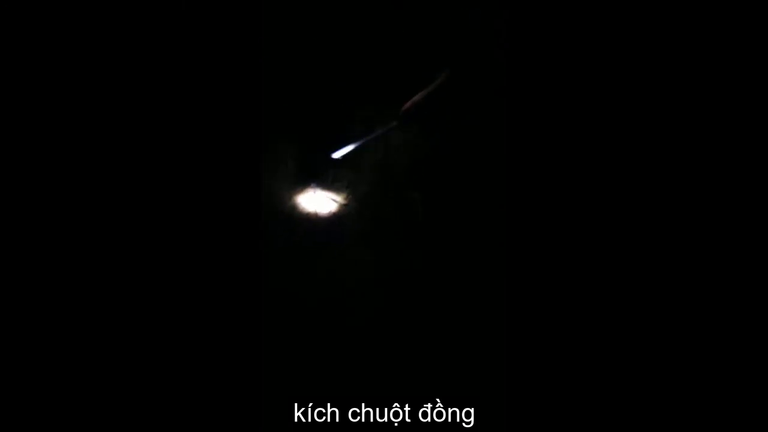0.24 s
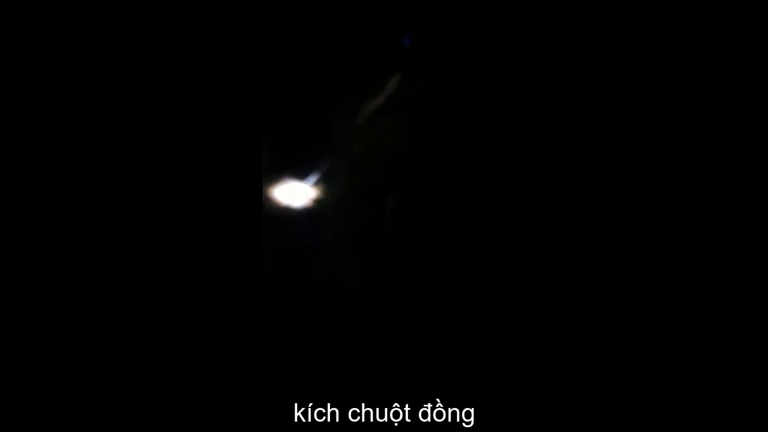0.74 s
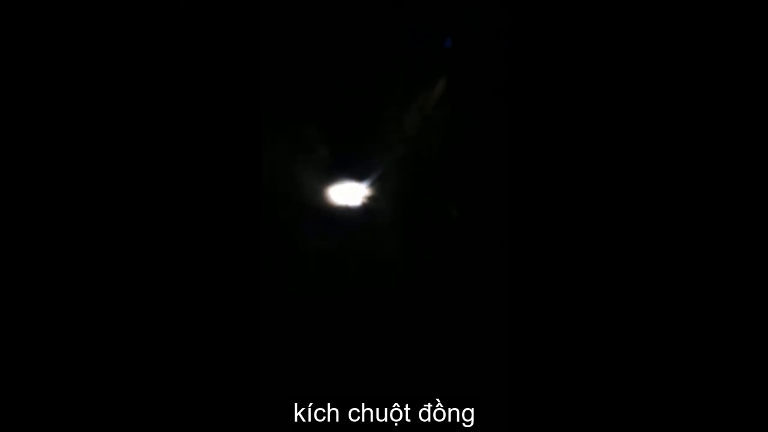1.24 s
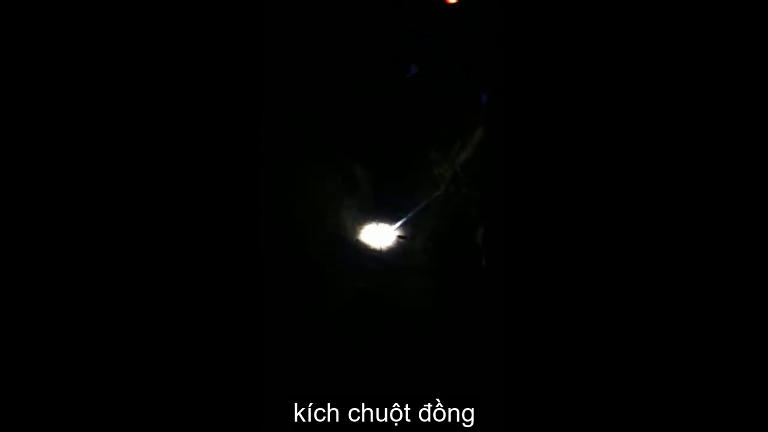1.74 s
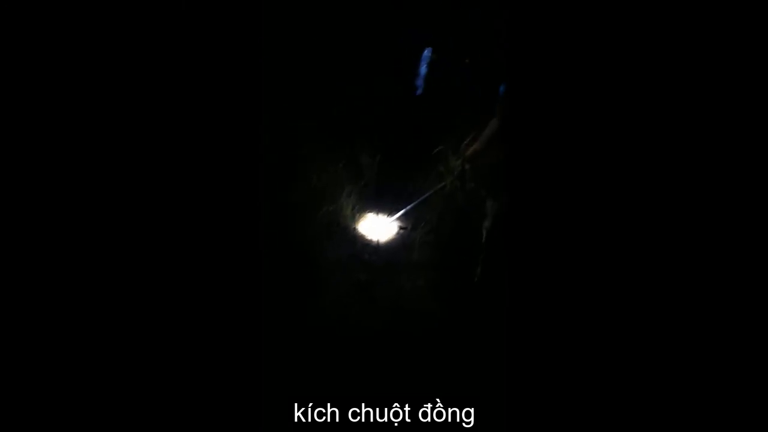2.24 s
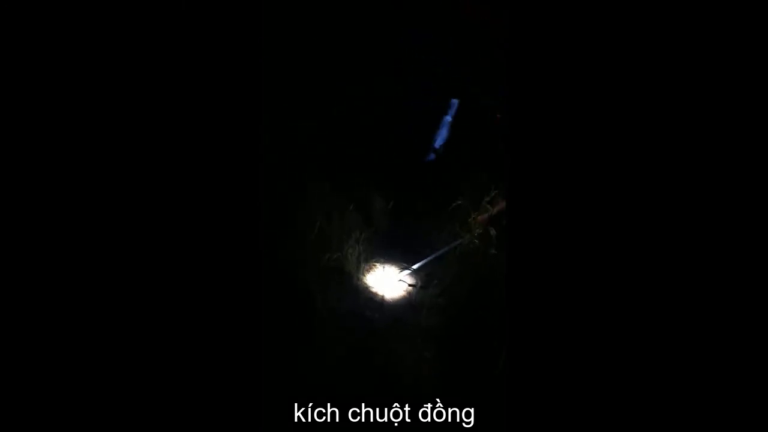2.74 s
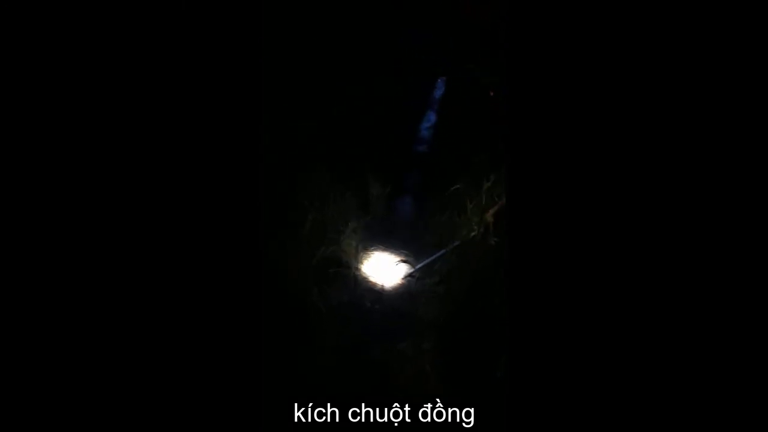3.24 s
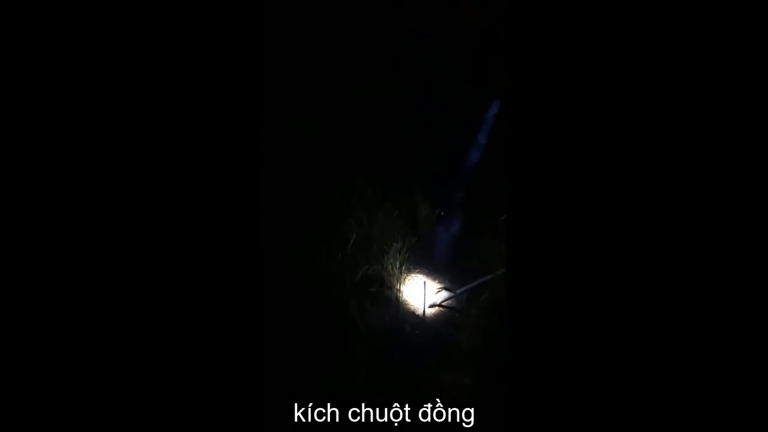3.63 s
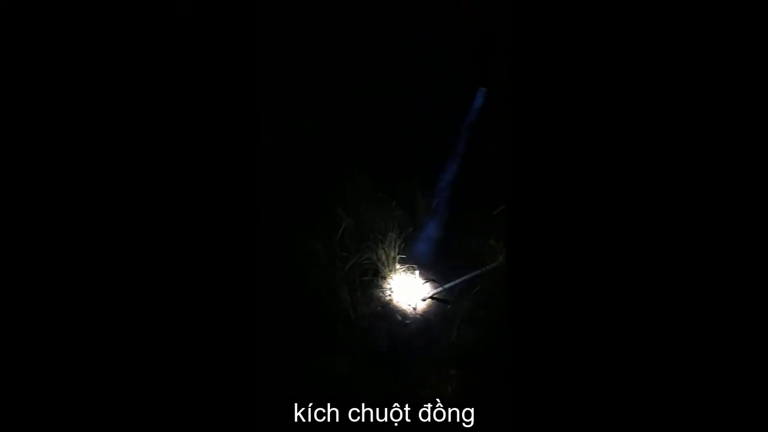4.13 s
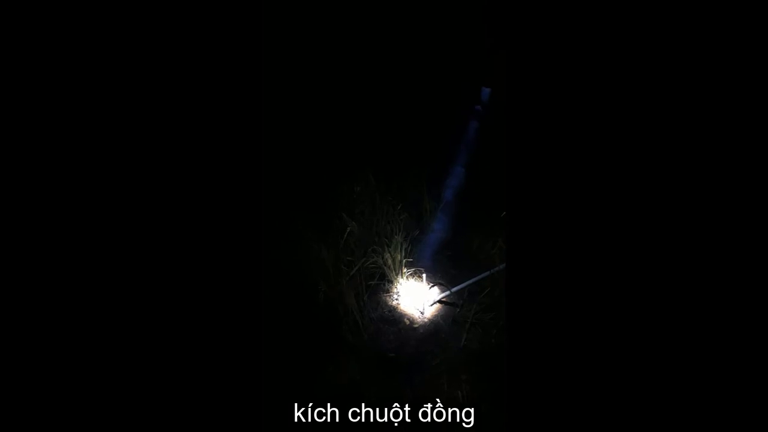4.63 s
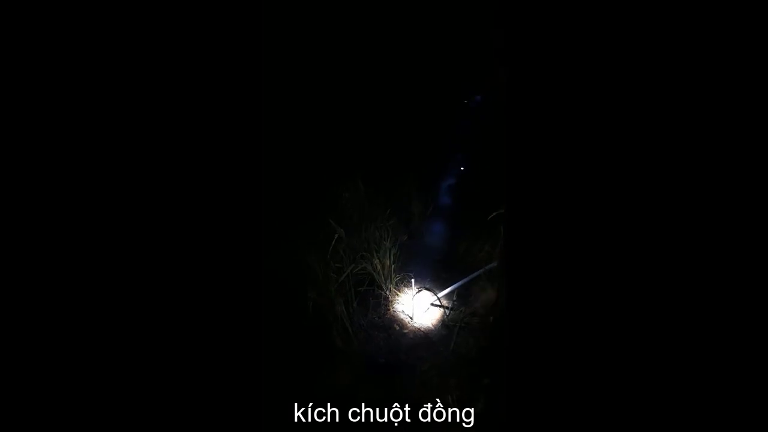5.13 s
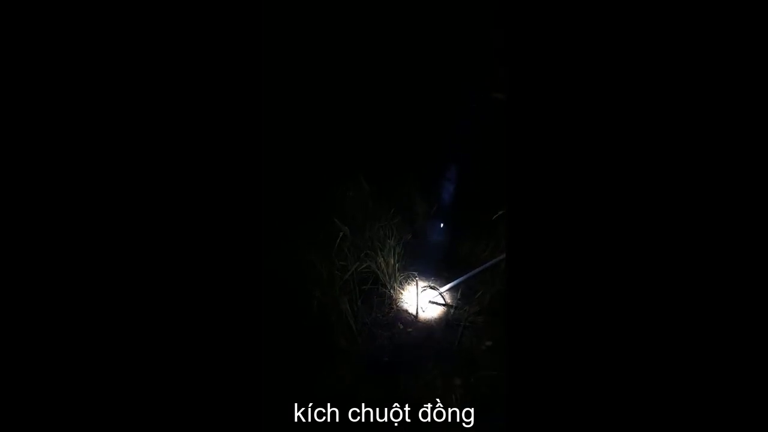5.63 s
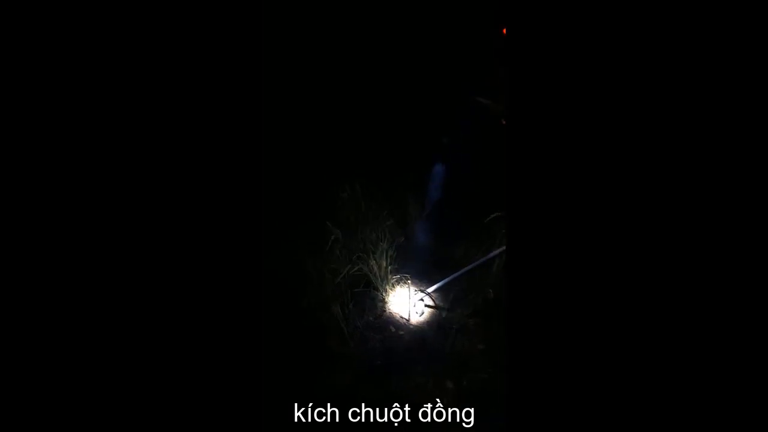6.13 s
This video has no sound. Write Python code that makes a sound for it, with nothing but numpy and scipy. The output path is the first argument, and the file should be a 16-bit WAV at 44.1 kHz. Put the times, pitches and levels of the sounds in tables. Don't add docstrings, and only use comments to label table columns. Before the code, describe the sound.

A grassy field at night: a steady high chorus of insects and far frogs over a faint low pump drone. Close by, someone moves through wet grass with swishes, crisp snaps and one sharp early pole knock. A small frog gives short, even creaking calls. The grass calms midway, then a flurry of snaps leads to a short rodent squeal. One close microphone, open air.

```python
import sys
import numpy as np
from scipy import signal
from scipy.fft import rfft, irfft, next_fast_len
from scipy.io import wavfile
from scipy.ndimage import uniform_filter1d

SR = 44100
rng = np.random.default_rng(int(sys.argv[2]) if len(sys.argv) > 2 else 0)


def wrap_up_sound(samples):
    columns = np.atleast_2d(samples).T
    tamed = np.clip(columns, -1, 1)
    steps = np.round(tamed * 32767).astype(np.int16)
    wavfile.write(sys.argv[1], SR, steps)


def invert_db(x):
    u = np.asarray(x, float) / 20
    return 10 ** u


N = 281029

# freq_hz, density_db
BLADE_SPECTRUM = [(1060, -60), (1800, -34), (2890, -8), (3130, -4), (3770, -7), (4540, 0.5), (5320, 1.5),
                  (6230, -2), (7290, 3.5), (8010, 0.5), (10000, -13), (13000, -54), (22000, -120)]
# freq_hz, density_db
FINE_SPECTRUM = [(9000, -30), (9700, -16), (10400, -13), (11500, -8), (13500, -5), (15500, 0.5),
                 (15900, -12)]
# freq_hz, density_db
STEM_SPECTRUM = [(600, -7.0), (900, -4.5), (1300, 6.5), (2200, 5.5), (2800, 4.5)]
# freq_hz, density_db
GROUND_SPECTRUM = [(180, -6), (280, -1.5), (500, -1.5), (900, -2.5), (1400, -10)]
# start_s, hold_s, level_db
SWEEPS = [(0, .55, -42), (.79, .06, -36.5), (.9, 0.1, -35), (2.19, 0.12, -38), (2.42, 0.06, -42.5),
          (3.12, 0.061, -42.5), (3.21, 0.05, -39.5), (3.38, 0.036, -40.5), (4.56, 0.051, -42.5),
          (5.17, .05, -44), (5.3, 0.28, -40), (5.64, 0.076, -45), (6.12, 0.019, -46.5), (6.35, .05, -44.5)]
# time_s, level_db
SETTLING = [
    (0, -40.5),
    (1.2, -46.5),
    (2.1, -47.5),
    (2.8, -49),
    (3.66, -50),
    (3.8, -58),
    (4.35, -53.5),
    (4.9, -49),
    (5.9, -46.5),
    (6.37, -48),
]
# start_s, hold_s, level_db, stems_re_ground_db
TREADS = [(0, 0.19, -62.5, 4), (0.48, 0.12, -58.5, 5), (.73, .1, -60.5, 3), (.86, 0.19, -60, 4),
          (1.21, 0.11, -74.5, 17), (1.438, 0.16, -73.5, 18), (1.885, 0.25, -70, 14),
          (2.2, 0.039, -62.5, -6), (2.397, 0.067, -57, 1.5), (3.21, 0.1, -63.5, 8), (3.61, 0.2, -65, -20),
          (4.71, 0.021, -57, 4), (4.835, .17, -55, 3), (5.048, 0.024, -57, 9), (5.254, 0.18, -57.5, -11),
          (5.554, 0.11, -59, -11), (5.632, 0.028, -70, 13.5), (6.343, .04, -77, 3)]
# time_s, peak_db, ring_hz
SNAPS = [(0.035, -16, 7150), (0.2268, -21, 4260), (0.735, -22.5, 5500), (1.553, -25, 5460),
         (1.994, -31, 7360), (2.1944, -22, 7000), (2.25, -22, 7350), (2.4088, -15, 5600),
         (2.4274, -25, 4700), (2.721, -38, 5560), (3.053, -27.5, 7140), (3.388, -36, 7160),
         (3.4078, -19, 7250), (3.4991, -23, 6900), (4.0594, -37, 7750), (4.2565, -24, 7200),
         (4.7006, -24, 5260), (2.4736, -23, 4950), (5.06, -18.5, 6030), (5.3045, -31, 7980),
         (5.4192, -22, 7600), (5.441, -22.5, 7500), (5.5102, -17.5, 5900), (5.5252, -21, 6500),
         (5.5493, -23, 8000), (5.581, -22.5, 7080), (5.594, -24, 6000), (5.8386, -20, 7500),
         (5.9203, -15, 7260), (6.2618, -29, 7660)]
# time_s, peak_db
BRIGHT_SPITS = [
    (2.4087, -27),
    (2.721, -35),
    (5.5488, -31),
    (5.9204, -28),
]
# time_s, peak_db, ring_hz
KNOCKS = [(0.2264, -21.5, 1350), (0.489, -39.5, 1300), (0.597, -15, 1320), (0.729, -24.5, 1870),
          (1.552, -37.5, 1270), (2.409, -19, 1180), (2.409, -26, 2340), (2.4111, -26.5, 3250),
          (2.401, -37, 1100), (4.807, -39.5, 1800), (2.4325, -33, 1970), (2.939, -33.5, 1620),
          (3.254, -36, 1320), (3.28, -32, 1370), (3.421, -39, 1030), (3.513, -36, 1930),
          (3.542, -38.5, 1270), (4.256, -57, 2500), (4.701, -37, 1920), (4.712, -36, 1920),
          (4.839, -40, 2230), (4.867, -44, 2237), (5.057, -31, 1600), (5.074, -32, 2140), (5.92, -39, 2300)]
# time_s, peak_db, ring_hz
BUMPS = [(2.408, -36, 687), (2.429, -41, 665), (2.449, -47, 433), (3.421, -52, 800), (3.62, -49, 556),
         (3.652, -45.5, 530), (3.697, -49, 362), (3.74, -52, 584), (3.762, -53, 507), (3.789, -59, 660),
         (3.887, -57, 580), (4.712, -47, 710), (4.838, -47, 738), (4.901, -48, 730), (4.97, -47, 804),
         (5.057, -43, 540), (5.329, -50, 610), (5.599, -51, 480), (6.31, -54, 520)]
# time_s, pitch_hz, level_db, hoarseness_0_to_1
SQUEALS = [
    [(6.040, 1810, -41, 0.8), (6.042, 1804, -23.5, 0.85), (6.052, 1752, -19.5, 0.45),
     (6.062, 1755, -23, 0.92), (6.0695, 1890, -22, 1)],
    [(6.0695, 2020, -29, 1.08), (6.076, 2115, -17.5, 0.95), (6.082, 2176, -13.5, 0.1),
     (6.090, 2258, -14, 0.08), (6.097, 2216, -10, 0), (6.102, 2200, -16, 0.08), (6.107, 2114, -19, 0.77),
     (6.117, 2130, -25.5, 0.74), (6.121, 2200, -50, 0.7)],
    [(6.122, 2620, -39, 0), (6.125, 2470, -28, .1), (6.131, 2490, -29, 0), (6.133, 2920, -39, 0.3),
     (6.138, 2980, -46, .2)],
]
# time_s, pitch_hz, level_db, hoarseness_0_to_1
SQUEAK = [
    (5.632, 2265, -50, .05),
    (5.642, 2305, -35, 0),
    (5.662, 2360, -28, 0.24),
    (5.685, 2270, -31, 0),
    (5.697, 2250, -50, 0),
]
# freq_hz, gain_db
THROAT = [(900, -29), (2200, -27.5), (3600, -12), (4500, -6), (5500, 2.5), (6700, -1.5), (9000, -13.5),
          (11000, -25.5), (14000, -45)]
# first_s, calls_count, peak_db, pulse_hz, waver_share
FROG_BOUTS = [
    (1.455, 8, -35.5, 372, .006),
    (5.012, 1, -29, 370, .004),
    (5.213, 4, -27.5, 360, .022),
    (6.023, 1, -31.5, 362, .01),
]
# time_s, peak_db, length_s
FROG_STRAYS = [
    (4.821, -30, 0.013),
    (6.237, -30.5, 0.017),
    (6.2662, -34, 0.067),
    (1.256, -35, .04),
    (3.119, -39, 0.045),
    (3.332, -38.5, 0.052),
]
# first_s, every_s, length_s, peak_db, pulse_hz, sac_hz
FAR_FROGS = [
    (.03, .226, .07, -47, 305, 3080),
    (.12, .263, .06, -47, 340, 3400),
]
# freq_hz, width_hz, level_db, third_of_clicks_per_s, throbs_per_s
CHORUS = [
    (3330, 510, -51, 900, 24),
    (3694, 580, -53, 660, 8.1),
    (4270, 380, -56.5, 970, 9.2),
    (7800, 520, -53.5, 1400, 12),
    (2200, 120, -66, 430, 1.6),
]
# freq_hz, width_hz, level_db
PUMP = [
    (79.1, 6.8, -63),
    (94.3, 17.4, -68.5),
    (125.9, 12, -66),
    (149.2, 17, -72),
    (172.7, 27, -76.5),
]
# freq_hz, density_db
AIR_SPECTRUM = [(18, -45), (30, 32), (86, 34), (149, -9), (221, 1), (962, -52), (1810, -15), (3400, 0),
                (6050, 12), (7870, -36), (9460, -43), (14000, -15), (16000, -24)]
# treble_level_db, patch_share, lone_cell_share
FLIPPED = [(-61, .02, .04), (-57.5, .36, .1), (-48, .36, .12), (-45.5, 0, .17)]

SWEEP_RISE_DB_PER_S, SWEEP_FALL_DB_PER_S = 129, 82
TREAD_RISE_DB_PER_S, TREAD_FALL_DB_PER_S = 300, 190
FINE_DB, FINE_LOSS_DB_PER_S = -2, 0.64
REF_BLADES_DB = -45
STEMS_DB, STEMS_FOLLOW_SHARE = -58.5, 0.74
GROUND_DB, GROUND_FOLLOW_SHARE = -71.5, 0.4
SPIT_DB, SPIT_LOSS_DB_PER_S = -24.5, 1
SNAP_T60_S, SPIT_T60_S, KNOCK_T60_S, BUMP_T60_S = 0.0035, 0.003, 0.0092, 0.029
SHUT_GAIN = 2.4
FROG_EVERY_S, FROG_CALL_S, FROG_WAVER_S = .2018, .062, 0.046
FROG_SAC_HZ, FROG_WIDTH_HZ, FROG_PULSE_HZ = 3830, 560, 364.3
FROG_SAG_PER_S = .3
AIR_DB = -70


def grass():
    sweep_power = swells(SWEEPS, SWEEP_RISE_DB_PER_S, SWEEP_FALL_DB_PER_S)
    settling_power = invert_db(2 * in_time(SETTLING)[0])
    blades_db = 10 * np.log10(sweep_power + settling_power)
    fine_db = blades_db + FINE_DB - FINE_LOSS_DB_PER_S * np.arange(N) / SR
    swing_db = blades_db - REF_BLADES_DB
    grains_per_s = 3500 * invert_db(.3 * swing_db + 1.5 * drift(25))
    rub = [rms_one(grains(grains_per_s, 1.83)) + 0.52 * rng.standard_normal(N) for k in "ab"]
    blades = invert_db(blades_db + 3) * banded(rub, BLADE_SPECTRUM, patchy_db=.9, flicker_hz=20)
    fine = invert_db(fine_db) * banded(rub, FINE_SPECTRUM, patchy_db=1.2, flicker_hz=20)
    return blades + fine + stems(rub, swing_db) + ground(swing_db)


def stems(rub, swing_db):
    rows = [(s, hold_s, db + stems_db) for s, hold_s, db, stems_db in TREADS]
    bent_power = swells(rows, TREAD_RISE_DB_PER_S, TREAD_FALL_DB_PER_S)
    stirred_power = invert_db(2 * (STEMS_DB + STEMS_FOLLOW_SHARE * swing_db))
    rubbed = banded(rub, STEM_SPECTRUM, patchy_db=2.0, flicker_hz=20.6)
    return rubbed * np.sqrt(bent_power + stirred_power)


def ground(swing_db):
    rows = [row[:3] for row in TREADS]
    pressed_power = swells(rows, TREAD_RISE_DB_PER_S, TREAD_FALL_DB_PER_S)
    stirred_power = invert_db(2 * (GROUND_DB + GROUND_FOLLOW_SHARE * swing_db))
    lumps = [rms_one(grains(1500, 3.5)) + .5 * rng.standard_normal(N) for k in "ab"]
    yielding = banded(lumps, GROUND_SPECTRUM, patchy_db=0.5, flicker_hz=22)
    return yielding * np.sqrt(pressed_power + stirred_power)


def snaps():
    spits = [(s, peak_db + SPIT_DB - SPIT_LOSS_DB_PER_S * s) for s, peak_db, hz in SNAPS]
    spits += list(BRIGHT_SPITS)
    body = blows([(*row, SNAP_T60_S) for row in SNAPS], crack_db=-3, below=.45, above=1.4)
    spit = blows([(*row, 12500, SPIT_T60_S) for row in spits], crack_db=8, below=.75, above=1.3)
    return body + spit


def knocks():
    return blows([(*row, KNOCK_T60_S) for row in KNOCKS], crack_db=-9, below=0.41, above=1.73)


def bumps():
    return blows([(*row, BUMP_T60_S) for row in BUMPS], crack_db=10, below=.5, above=1.7)


def frogs():
    calls = [(first_s + k * FROG_EVERY_S, db, FROG_CALL_S, pulse_hz, waver)
             for first_s, count, db, pulse_hz, waver in FROG_BOUTS for k in range(count)]
    calls += [(*row, FROG_PULSE_HZ, .01) for row in FROG_STRAYS]
    out = croak(calls, FROG_SAC_HZ, FROG_WIDTH_HZ)
    for first_s, every_s, length_s, db, pulse_hz, sac_hz in FAR_FROGS:
        chance = rng.standard_normal((30, 3))
        far = [(first_s + k * every_s + .015 * late, db + 2 * loud, length_s, pulse_hz * (1 + .02 * high), .03)
               for k, (late, loud, high) in enumerate(chance)]
        out += croak(far, sac_hz, 400)
    return out


def croak(calls, sac_hz, width_hz):
    t, gate, rate_hz = np.arange(N) / SR, np.zeros(N), np.full(N, 350.)
    for s, peak_db, length_s, pulse_hz, waver in calls:
        edge = np.clip(np.minimum((t - s) / 0.002, (s + length_s - t) / 0.01), 0, 1)
        gate += invert_db(peak_db - 7.0) * edge
        on = edge > 0
        into_s = (t - s)[on]
        wavering = waver * np.cos(2 * np.pi * into_s / FROG_WAVER_S)
        rate_hz[on] = pulse_hz * (1 - FROG_SAG_PER_S * into_s - wavering)
    turns = np.cumsum(rate_hz * (1 + .007 * drift(14) + .008 * drift(90))) / SR
    pulses = np.diff(np.floor(turns), prepend=0) * invert_db(1.2 * drift(150))
    rung = resonance(resonance(pulses, sac_hz, width_hz), sac_hz, width_hz * 0.66)
    rung += 0.13 * resonance(pulses, 0.82 * sac_hz, 340)
    called = gate * rms_one(rung)
    return called + .3 * np.roll(called, 236) + 0.25 * np.roll(called, 470)


def squeals():
    out, t = np.zeros(N), np.arange(N) / SR
    scatter = rms_one(signal.lfilter([1], [1, -.85], rng.standard_normal(N)))
    stutter = drift(400)
    for rows, harmonics in [(call, 6) for call in SQUEALS] + [(SQUEAK, 2)]:
        on = (t > rows[0][0]) & (t < rows[-1][0])
        pitch_hz, level_db, hoarse = [c[on] for c in in_time(rows)]
        hoarse = np.clip(hoarse, 0, 1)
        phase = 2 * np.pi * np.cumsum(pitch_hz * (1 + 0.304 * hoarse * scatter[on])) / SR
        voice = 0
        for k in range(1, harmonics + 1):
            gain = SHUT_GAIN if harmonics == 2 and k == 1 else 1
            voice = voice + gain * np.sin(k * phase + k * k)
        out[on] += invert_db(level_db + hoarse * 2.5 * stutter[on]) * voice
    out = colour(out, THROAT)
    return out + 0.14 * np.roll(out, 260)


def chorus():
    out = np.zeros(N)
    for hz, width_hz, level_db, per_s, throb_hz in CHORUS:
        clicks = grains(per_s * 3, 1.7)
        sung = resonance(resonance(clicks, hz, width_hz * 1.57), hz, width_hz * 1.57)
        out += invert_db(level_db + 1.8 * drift(throb_hz)) * rms_one(sung)
    return out


def pump():
    out = np.zeros(N)
    for hz, width_hz, level_db in PUMP:
        order = resonance(resonance(rng.standard_normal(N), hz, width_hz), hz, width_hz)
        out += invert_db(level_db) * rms_one(order)
    return out


def air():
    return invert_db(AIR_DB) * banded(rng.standard_normal((2, N)), AIR_SPECTRUM, patchy_db=1.0, flicker_hz=5)


def blows(events, crack_db, below, above):
    out, t = np.zeros(N + 2000), np.arange(2000) / SR
    cracks = rng.standard_normal((len(events), 2000))
    for (s, peak_db, hz, t60_s), crack in zip(events, cracks):
        fade = invert_db(-60 * t / t60_s) * (1 - np.exp(-t * hz * 6))
        ring = np.sin(2 * np.pi * hz * t) + 0.033 * np.sin(2 * np.pi * 0.79 * hz * t)
        struck = (ring + invert_db(crack_db) * crack) * fade
        sos = signal.butter(2, [below * hz, min(above * hz, .45 * SR)], "band", fs=SR, output="sos")
        out[round(s * SR):][:2000] += invert_db(peak_db + 4) * signal.sosfilt(sos, struck)
    return out[:N]


def swells(rows, rise_db_per_s, fall_db_per_s):
    t, power = np.arange(N) / SR, np.zeros(N)
    for s, hold_s, db in rows:
        rise_db = rise_db_per_s * np.maximum(s - t, 0)
        fall_db = fall_db_per_s * np.maximum(t - s - hold_s, 0)
        power += invert_db(2 * (db - rise_db - fall_db))
    return power


def banded(source, spectrum, patchy_db, flicker_hz):
    low_hz, high_hz = max(spectrum[0][0], 25), min(spectrum[-1][0], 17000)
    edges_hz = np.geomspace(low_hz, high_hz, int(2 * np.log2(high_hz / low_hz)) + 2)
    source, out, together = colour(np.array(source), spectrum), np.zeros(N), drift(flicker_hz / 2)
    for k, band_hz in enumerate(zip(edges_hz, edges_hz[1:])):
        sos = signal.butter(2, band_hz, "band", fs=SR, output="sos")
        gain_db = patchy_db * (1.09 * together + drift(flicker_hz))
        out += invert_db(gain_db) * signal.sosfilt(sos, source[k % 2])
    return rms_one(out)


def grains(per_s, spread_db):
    sizes = invert_db(spread_db * np.minimum(rng.exponential(1, N), 5)) * rng.choice([-1, 1], N)
    return sizes * (rng.random(N) < per_s / SR)


def resonance(x, hz, width_hz):
    r = np.exp(-np.pi * width_hz / SR)
    zeros = np.array([1, 0, -1]) * (1 - r * r) / 2
    return signal.lfilter(zeros, [1, -2 * r * np.cos(2 * np.pi * hz / SR), r * r], x + 1e-18)


def colour(x, spectrum):
    size = next_fast_len(N)
    hz = np.maximum(np.arange(size // 2 + 1) * SR / size, 1)
    return irfft(rfft(x, size) * invert_db(at_hz(spectrum, hz)), size)[..., :N]


def drift(rate_hz):
    r = np.exp(-80 * np.pi * rate_hz / SR)
    slow = signal.lfilter([1], [1, -2 * r, r * r], rng.standard_normal(N // 40 + 2002))[2000:]
    return np.interp(np.arange(N) / 40, np.arange(len(slow)), rms_one(slow))


def rms_one(x):
    return x / np.sqrt(np.mean(x ** 2) + 1e-20)


def in_time(rows):
    s, *columns = np.transpose(rows)
    return [np.interp(np.arange(N) / SR, s, c) for c in columns]


def at_hz(points, hz):
    points = np.array(points)
    return np.interp(np.log(hz), np.log(points[:, 0]), points[:, 1])


def scene():
    work = grass() + snaps() + knocks() + bumps()
    animals = frogs() + squeals()
    background = chorus() + pump() + air()
    return np.tile(work + animals + background, (2, 1))


def flip(x):
    hz, s, z = signal.stft(x, SR, nperseg=1024)
    band = np.clip((hz - 9000) // 520 + 1, 0, 15).astype(int)
    draws = rng.random((2, 16, len(s) // 2 + 1)).repeat(2, axis=2)[..., :len(s)]
    field = uniform_filter1d(uniform_filter1d(draws[0], size=9, axis=1), size=3, axis=0)
    rank = field.ravel().argsort().argsort().reshape(field.shape) / field.size
    power = uniform_filter1d(np.sum(np.abs(z[0, hz > 9000]) ** 2, axis=0) * 4 / 3, size=5)
    treble_db = 10 * np.log10(power + 1e-12)
    level_db, patch, lone = np.transpose(FLIPPED)
    in_patch = rank < np.interp(treble_db, level_db, patch)
    alone = draws[1] < np.interp(treble_db, level_db, lone)
    flipped = in_patch | alone
    flipped[0] = False
    z[1] *= 1 - 2 * flipped[band]
    return signal.istft(z, SR, nperseg=1024)[1][:, :N]


def roll_off(x):
    return signal.sosfilt(signal.butter(12, 16830, fs=SR, output="sos"), x)


def record(dry):
    top_cut = signal.cheby2(16, 60, 16000, fs=SR, output="sos")
    mix = signal.sosfilt(top_cut, flip(dry))
    return roll_off(mix)


dry = scene()
out = record(dry)
wrap_up_sound(out)
```